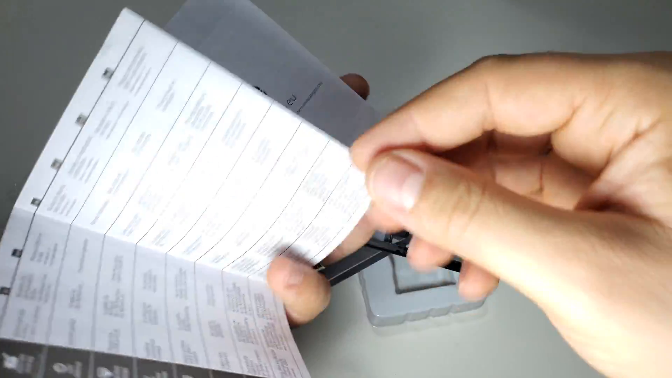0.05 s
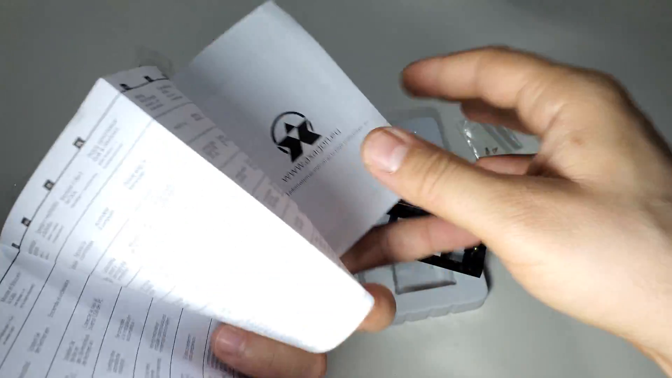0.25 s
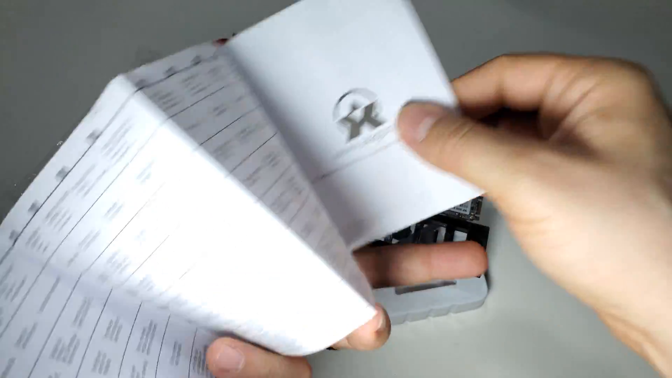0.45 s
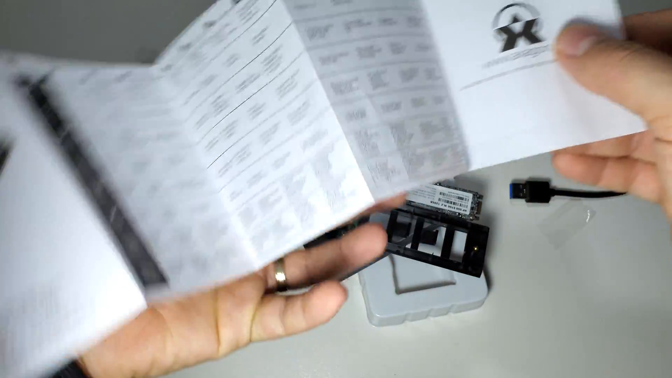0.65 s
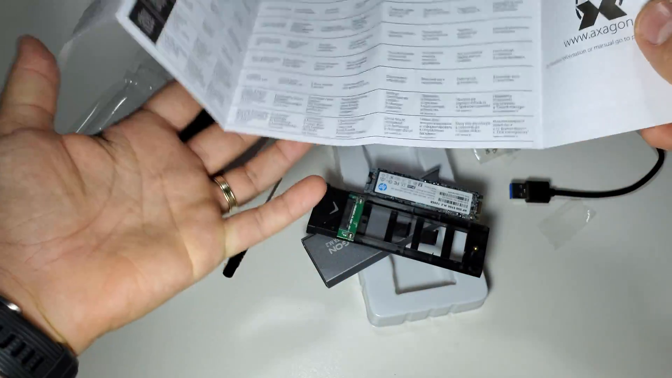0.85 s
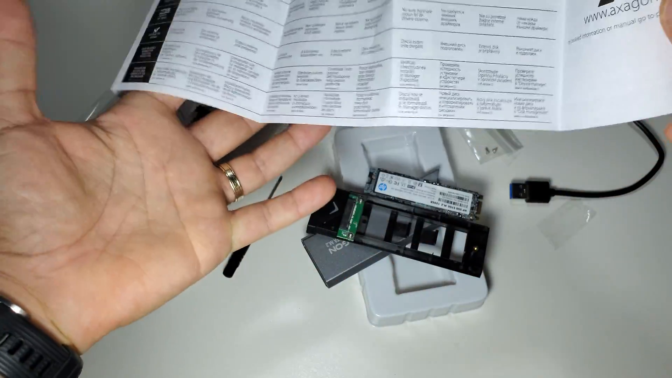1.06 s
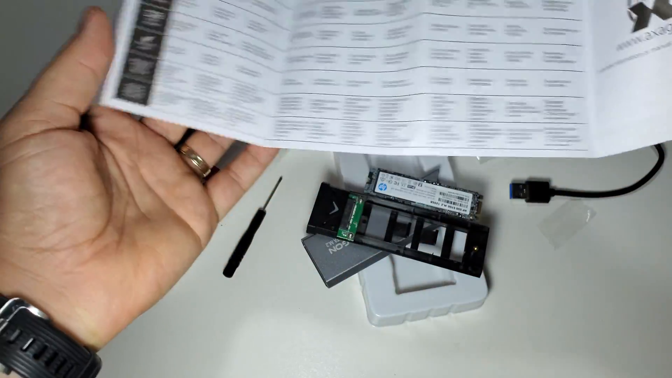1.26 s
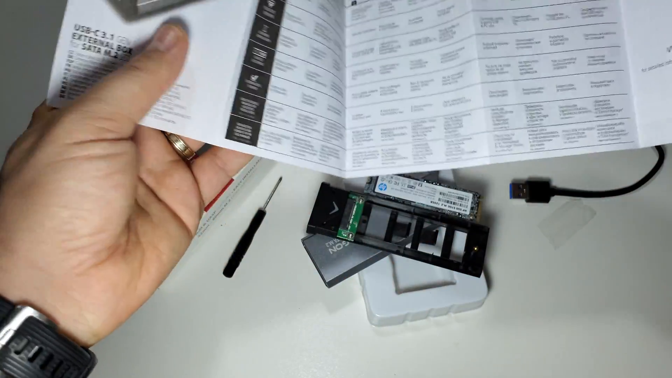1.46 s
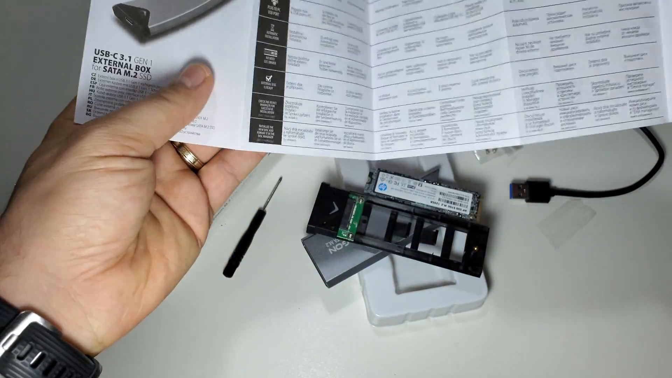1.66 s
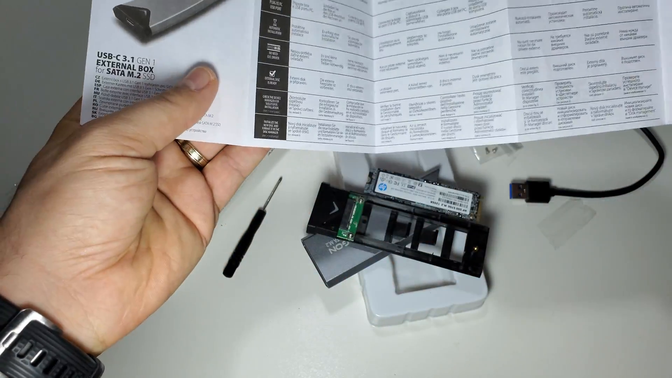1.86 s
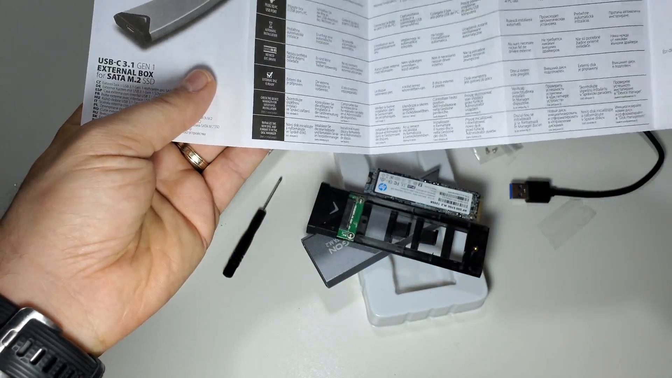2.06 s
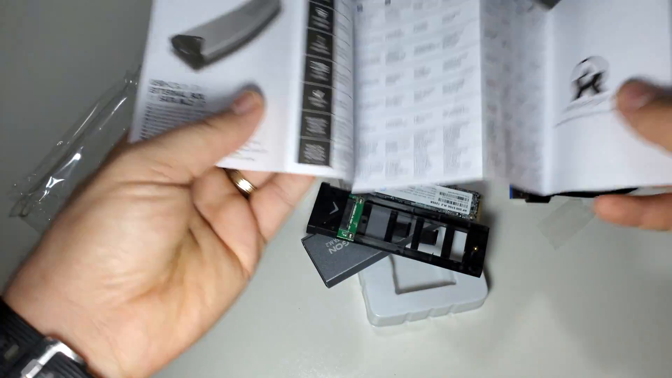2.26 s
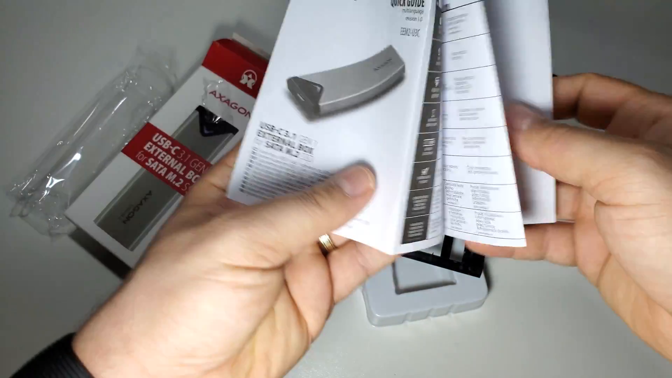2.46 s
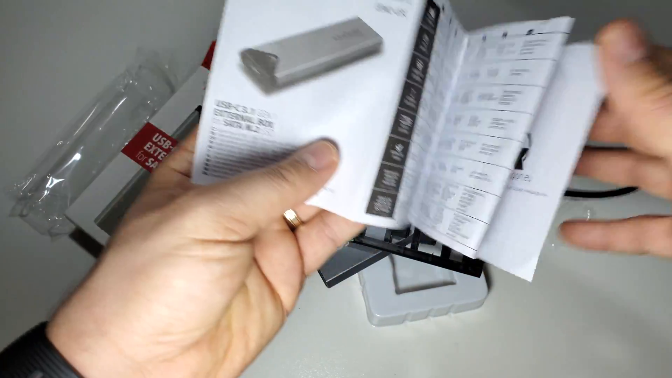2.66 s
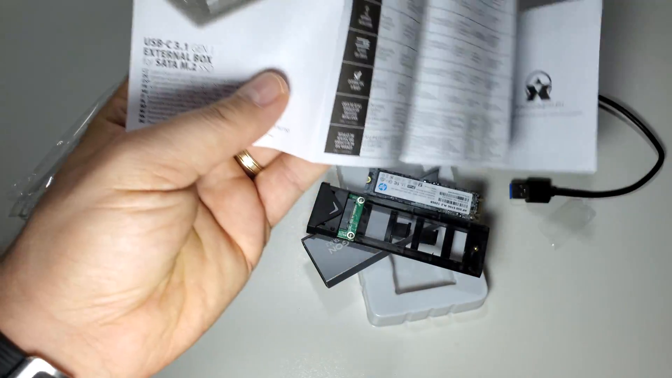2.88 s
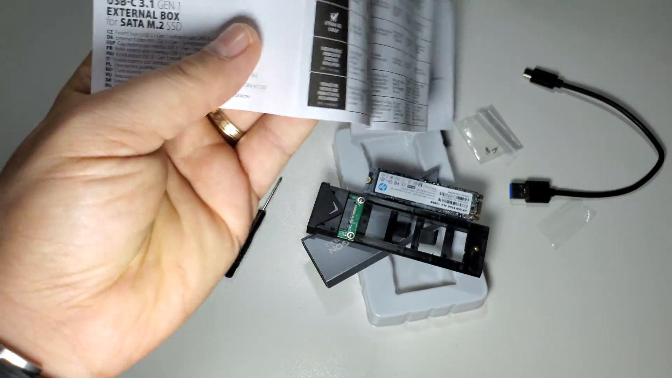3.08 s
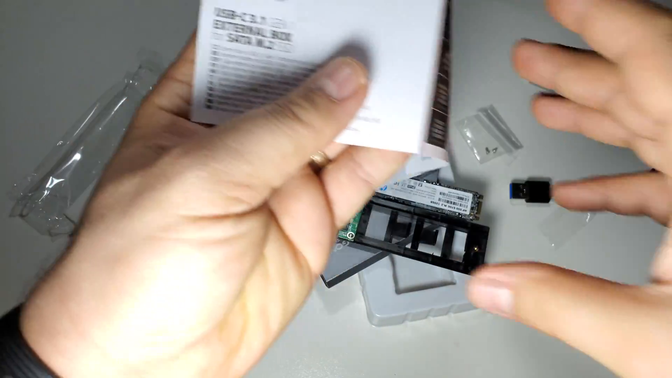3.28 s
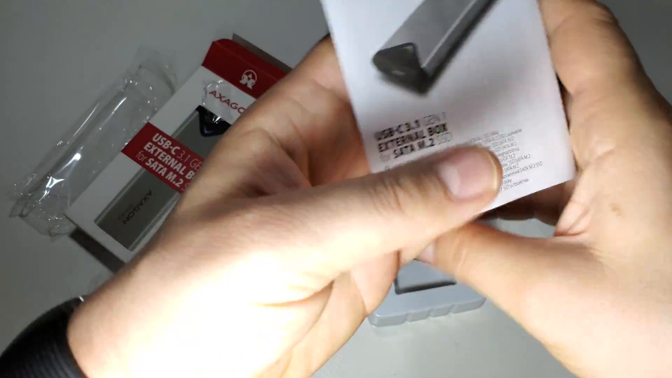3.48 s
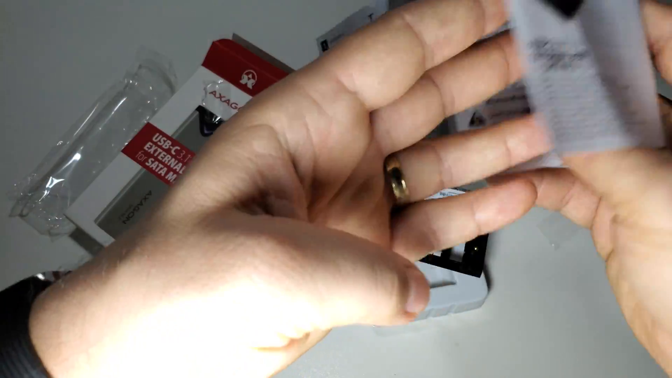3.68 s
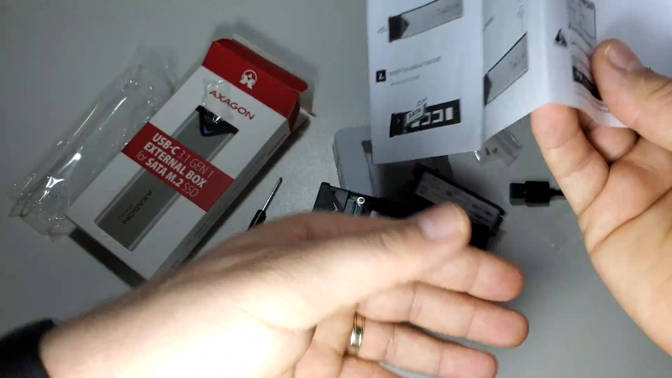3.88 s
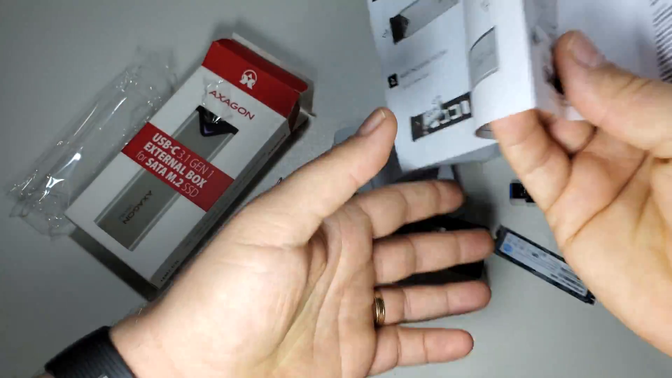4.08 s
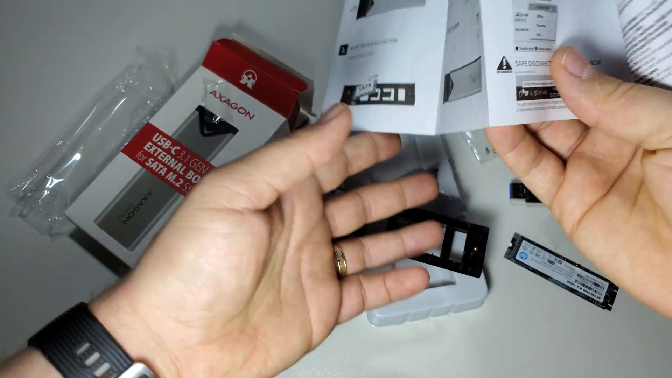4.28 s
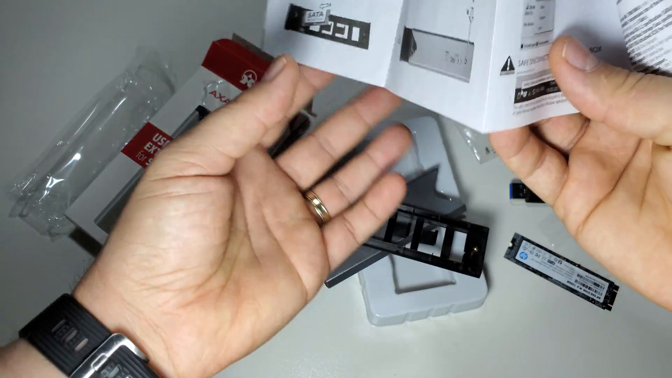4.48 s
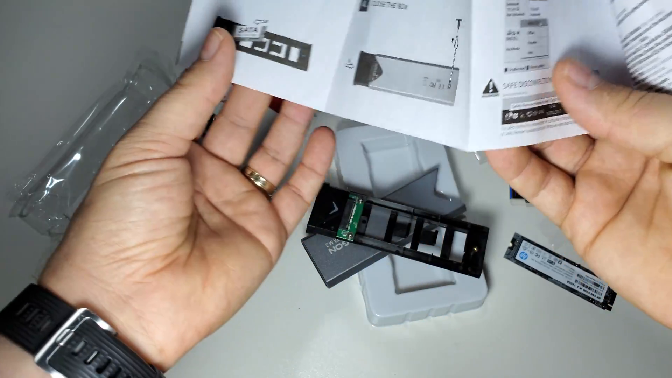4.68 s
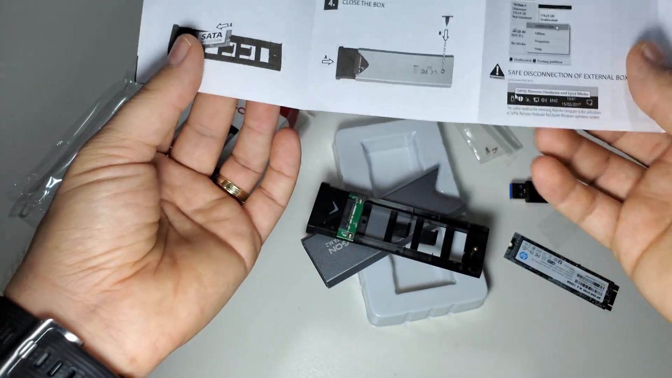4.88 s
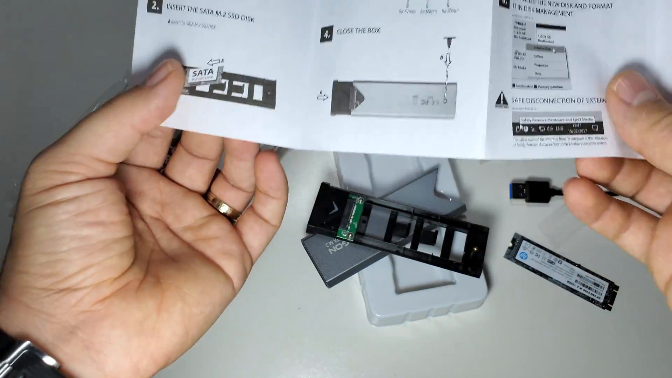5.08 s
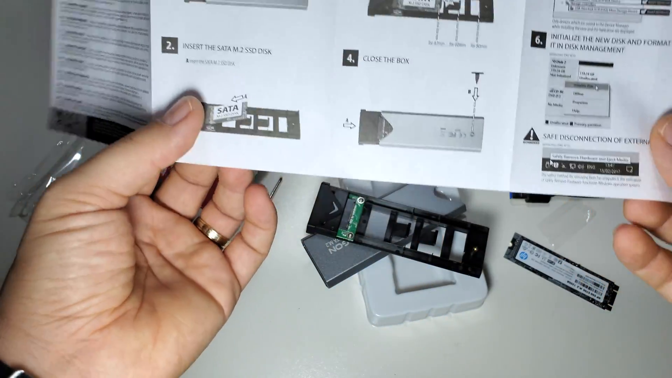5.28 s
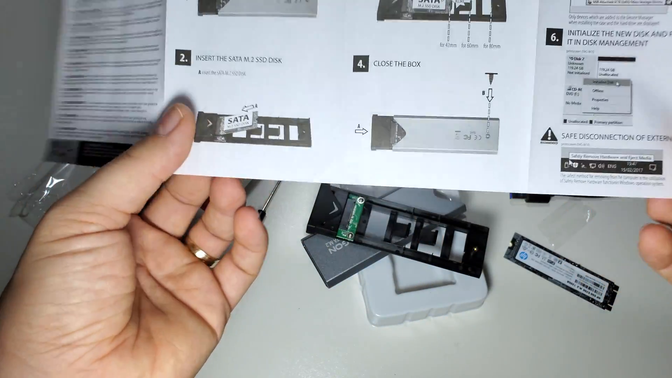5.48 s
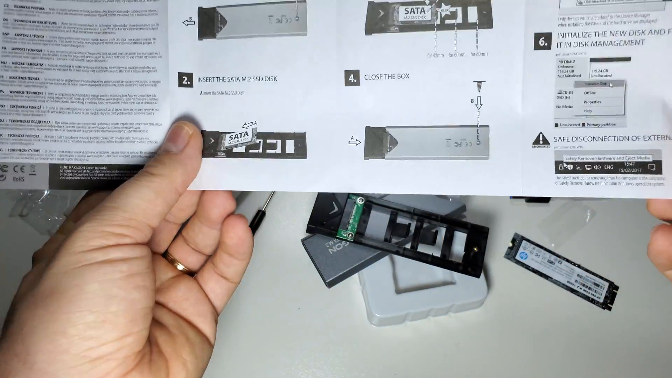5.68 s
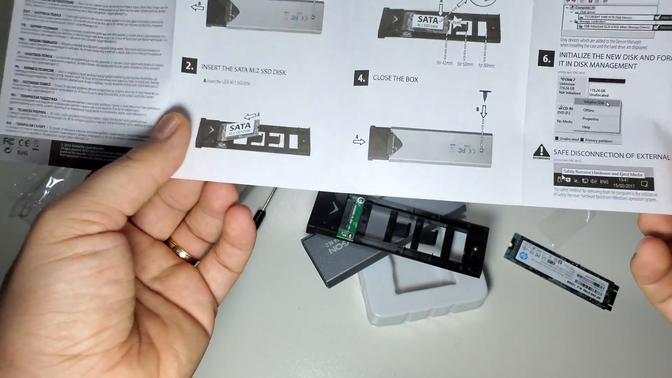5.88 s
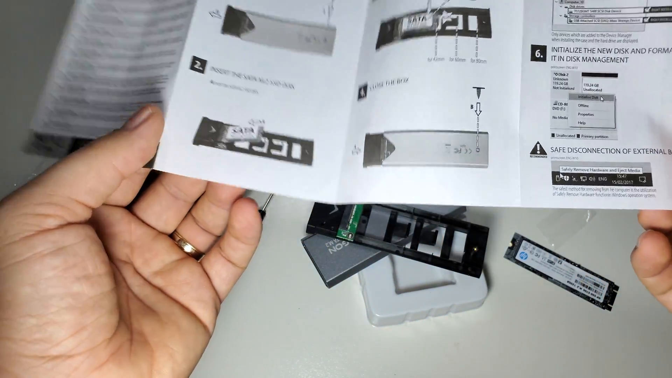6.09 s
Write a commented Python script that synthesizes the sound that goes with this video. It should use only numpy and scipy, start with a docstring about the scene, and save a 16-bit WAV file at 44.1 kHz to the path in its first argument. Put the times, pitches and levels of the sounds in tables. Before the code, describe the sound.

A paper leaflet is unfolded and turned close by, rustling, crackling and snapping at its creases, with a brief chattering plastic scrape across a desk.

```python
"""A paper leaflet is unfolded and turned in two hands just under a phone, in a small quiet room.
From the start fingers hiss along the sheet (grainy coloured noise), it flexes and flaps, and creases
snap (a click, a crackle and a ringing panel). Near 3.8 s a hand drags a small plastic case across the
desk: friction and sudden slips chatter in the case resonances. Loud creases snap as it stops near
4.1 s, then the paper handling goes on to just after 6 s. Room reflections and a faint hush lie under it all."""
import sys
import numpy as np
from scipy import signal
from scipy.fft import rfft, irfft
from scipy.io import wavfile
from scipy.ndimage import uniform_filter1d

SR = 44100
rng = np.random.default_rng(int(sys.argv[2]) if len(sys.argv) > 2 else 0)


def store_pcm(level_fs):
    """Save levels as 16-bit WAV."""
    pcm = np.round(np.clip(level_fs, -1, 1) * 32767).astype(np.int16)
    wavfile.write(sys.argv[1], SR, np.atleast_2d(pcm).T)


N = 270774  # length in samples
PORT_LAG = 3  # samples by which the right port hears the paper later


def undb(db):
    """Decibels to gain."""
    return 10 ** (np.asarray(db) / 20)


def unit(x):
    """Scale to rms 1."""
    return x / np.sqrt(np.mean(x ** 2))


def colour(x, shape):
    """Filter along the last axis by (pitch_hz, level_db) points, cutting 80 dB outside them."""
    count = x.shape[-1]
    pitch_hz, level_db = np.transpose(shape)
    log_hz = np.log(np.arange(1, count // 2 + 2) * SR / count)
    gain = undb(np.interp(log_hz, np.log(pitch_hz), level_db, left=-80, right=-80))
    return irfft(rfft(x) * gain, count)


def band(x, lo_hz, hi_hz, order=2):
    """Causal band-pass."""
    edges = np.clip([lo_hz, max(hi_hz, lo_hz + 10)], 10, .45 * SR)
    return signal.sosfilt(signal.butter(order, edges, "band", fs=SR, output="sos"), x)


def walk(rate):
    """Random level that glides to a new value about rate times a second."""
    hold = int(SR / rate)
    steps = np.repeat(rng.standard_normal(N // hold + 1), hold)
    return uniform_filter1d(steps, hold)[:N]


def pair(alike, count, lag=PORT_LAG):
    """Noise at the two ports, correlated by alike (0-1), the right one shifted by lag samples."""
    alike = np.clip(alike, 0, .99)
    mid, side = rng.standard_normal((2, count))
    shared = np.sqrt((1 + alike) / 2) * mid
    apart = np.sqrt((1 - alike) / 2) * side
    return np.array([shared + apart, np.roll(shared - apart, lag)])


def grains(rate, scatter_db, tail_s):
    """Envelope of tiny fibre slips: random times, a few large among many small, each dying fast."""
    hit = rng.random(N) < rate / SR
    size = rng.exponential(size=N)
    power = hit * undb(2 * scatter_db * np.minimum(size, 4))
    keep = np.exp(-1 / (tail_s * SR))
    return unit(np.sqrt(signal.lfilter([1 - keep], [1, -keep], power)))


# colour of the hush: pitch_hz [Hz], level_db [dB per Hz, relative]
HUSH_COLOUR = [(12, -37), (20, -4.5), (60, -3.5), (134, -12.5), (357, -17.5), (459, -21.5), (1060, -22.5),
               (1290, -28), (1960, -30), (16000, -34)]
HUSH_DB = -75.5  # rms


def quiet_hush():
    """Steady, bass-heavy noise of the quiet room."""
    return unit(colour(pair(0.21, count=N), HUSH_COLOUR)) * undb(HUSH_DB)


# how the reflections die: pitch_hz [Hz], t60_s [s], likeness of the two ports [0-1]
ROOM_DECAY = [(150, 0.23, .9), (650, 0.15, 1), (2280, 0.26, 0), (8600, 0.27, 0)]
ROOM_DB = -9  # gain after the tail is scaled to unit energy


def room(x):
    """Diffuse reflections, each region of pitch dying at its own pace, the bass alike at both ports."""
    t = np.arange(SR // 2) / SR
    tail = np.zeros((2, len(t)))
    for pitch_hz, t60_s, alike in ROOM_DECAY:
        diffuse = band(pair(alike, count=len(t)), pitch_hz / 2, min(pitch_hz * 2.18, 18000))
        tail += diffuse * np.exp(-np.log(1000) * t / t60_s)
    tail = tail * np.minimum(t / 0.0034, 1)  # reflections build up over 3.4 ms
    tail = tail / np.sqrt(np.sum(tail ** 2) / 2)
    mono = x.mean(axis=0, keepdims=True)
    return undb(ROOM_DB) * signal.fftconvolve(mono, tail, axes=1)[:, :N]


# steady friction, creeping and then sliding: time_s [s], force_db [dB]
DRAG_FORCE = [
    [(3.78, -38.5), (3.79, -43.5), (3.908, -42), (3.958, -34.5), (3.97, -49.5)],
    [(3.972, -44.5), (3.976, -29), (4.048, -29), (4.086, -51.5), (4.09, -24)],
]
# the case slips free: start_s [s], peak_db [dB], t60_s [s, at least 0.01 in use]
SLIPS_FREE = [(3.813, -46, 0.02), (3.859, -48, 0.074), (3.892, -46, 0.024), (3.9272, -29, 0.02),
              (3.954, -28, 0.015), (3.9747, -22.5, 0.022), (3.993, -13, 0.012), (4.013, -22.5, 0.019),
              (4.034, -17.5, 0.024), (4.1019, -8.5, 0.0079)]
# modes of the case: pitch_hz [Hz], half_width_hz [Hz], level_db [dB], change_while_creeping_db [dB]
CASE_MODES = [(950, 90, -6.5, -3), (1430, 82, 0.5, 3), (1846, 60, 3, -6), (3028, 50, 2, -1.5),
              (4670, 170, 0, -9.5), (5170, 42, -10, -6), (7500, 130, -5.5, -9.5)]
CREEP_DB, SLIDE_DB = -42.5, -34  # force at which the case only creeps, and at which all its modes speak
FLUTTER_DB = 2.5  # how much each mode wavers
WOBBLE_S, WOBBLE_HZ = .0006, 24.66  # time sway before smoothing, and its rate


def drag():
    """Friction and sudden slips on the desk drive the case modes, which flutter as the contact shifts."""
    time_s, force_db = np.transpose(sorted(map(tuple, np.vstack(DRAG_FORCE))))
    t = np.arange(N) / SR
    force = undb(np.interp(t, time_s, force_db, left=-120, right=-120)) * grains(700, 2.2, 0.0047)
    for start_s, peak_db, t60_s in SLIPS_FREE:
        fall_db = 60 * np.maximum(t - start_s, 0) / max(t60_s, .01)
        force = force + (t > start_s) * undb(peak_db - fall_db)
    slips = pair(0.51, count=N) * force

    smooth_db = 20 * np.log10(uniform_filter1d(force, 900) + 1e-9)
    creep = np.clip((SLIDE_DB - smooth_db) / (SLIDE_DB - CREEP_DB), 0, 1)
    shell, mode_power = np.zeros((2, N)), 0
    for pitch_hz, half_width_hz, level_db, creep_db in CASE_MODES:
        gain = undb(level_db + creep_db * creep + FLUTTER_DB * walk(90))
        shell += gain * band(slips, pitch_hz - half_width_hz, pitch_hz + half_width_hz)
        mode_power += undb(2 * level_db) * half_width_hz
    # the shifting contact bends the pitch of the case
    samples = np.arange(N)
    sway = samples + WOBBLE_S * SR * uniform_filter1d(walk(WOBBLE_HZ), 600)
    shell = np.array([np.interp(sway, samples, port) for port in shell])
    scrape = undb(-3.5) * band(slips, 470, 4700, order=1) + undb(-23.0) * band(slips, 8000, 16000)
    return np.sqrt(SR / 8 / mode_power) * shell + scrape


# moves of the hands: start_s [s], length_s [s], onset_ms [ms for the last 20 dB, at least 2 in use],
# rub_swell_db [dB], bend_swell_db [dB], hiss_db [dB], swish_db [dB], flex_db [dB], flap_db [dB],
# left_minus_right_db [dB]; the four levels hold midway through the move
HAND_MOVES = [(0.0, 0.068, 5.0, 4, -4.5, -66, -60, -49.5, -49, 2),
              (0.147, 0.067, 27, 13, 9.5, -59.5, -51, -55, -55, 3.6),
              (0.312, 0.045, 10, 2, 7, -68.5, -60, -71, -71.0, -1),
              (0.391, 0.12, 14, -13.0, -16, -53.0, -44.5, -46.5, -46.5, 1.6),
              (0.543, 0.098, 13, -11, 2.5, -63.5, -54, -48.0, -48.0, 2.5),
              (0.798, 0.11, 11.5, 1.0, 6, -55.5, -60.5, -56, -56.5, 2.5),
              (0.961, 0.062, 1.5, -8, -17, -79, -57, -48.5, -57.5, 1.6),
              (1.07, 0.095, 5.0, 14.5, 0.5, -71.5, -64.5, -62, -60.5, 3),
              (1.235, 0.11, 19, 9.5, -4, -51, -59.5, -60.5, -66, 1.3),
              (1.325, 0.14, 5.0, 9, 18, -52.5, -57, -53.0, -56.5, 1.5),
              (1.533, 0.13, 10.0, 5.5, -9, -60, -66.5, -65, -65, 3),
              (1.695, 0.055, 10.0, 9, -9, -64, -69.5, -64, -67, 3.5),
              (2.217, 0.081, 40.5, 0.5, 14, -67.5, -74.5, -76.5, -73, 1.5),
              (2.302, 0.093, 17, -12, 20, -62.5, -71, -65, -72.0, 0.4),
              (2.425, 0.052, 17, -5, -12, -60, -61, -51, -55.0, -2),
              (2.491, 0.13, -4, -7, -13, -48, -56.5, -61.5, -59, 0.2),
              (2.684, 0.11, 22, -1, -3.5, -60.5, -55, -60, -57, 0),
              (2.858, 0.15, 20.0, -1.5, -11, -67.0, -72, -66.0, -69, -2),
              (3.073, 0.099, 22.5, 11.5, 1, -75, -73.5, -64.5, -72, 4),
              (3.234, 0.12, 24, -3, 5.0, -66.5, -69, -68, -70, 3.5),
              (3.373, 0.13, 17, 11.5, 21, -60.5, -60.5, -64, -65, 2.5),
              (3.576, 0.16, 38, 7, 5.5, -56, -55.5, -57, -62.5, 2),
              (3.773, 0.021, 13, -10, -2, -52.5, -54, -60.0, -59.0, -2),
              (3.896, 0.16, 53, 19, 26, -43, -40.5, -51.5, -61, 0),
              (4.093, 0.013, -3, -17, -23, -40, -29, -31, -51, -0.5),
              (4.133, 0.058, 1.5, -14, -11, -37, -34.5, -36, -56, 0.5),
              (4.202, 0.051, 5.0, -2, -8, -64, -47.5, -49, -61, 0),
              (4.262, 0.17, 5.0, -15, -15.5, -66, -64, -64.5, -68.0, 0.5),
              (4.508, 0.064, 30.5, 10.5, 1.5, -63.0, -75.5, -71, -71.5, 2),
              (4.593, 0.098, 4, -6, 1, -68.5, -71, -63, -64.5, 1.8),
              (4.742, 0.059, 35, 7.5, 5.5, -56.5, -65.5, -75.0, -77, 0),
              (4.81, 0.067, 7, 18.5, -12.5, -66, -72, -52.5, -57.0, -2),
              (4.882, 0.14, 13.5, 7, -6, -64.5, -66.5, -57.5, -63.5, 1),
              (5.075, 0.12, 53, -1, -0.5, -52, -51.5, -59, -63, 1),
              (5.227, 0.097, 18, -5, 0, -58, -60.5, -58, -55.5, 2.3),
              (5.371, 0.053, 30.0, 14.5, 5, -54.5, -64.0, -61, -67, 2.4),
              (5.455, 0.039, 5.0, -3, -16, -85, -69.5, -61, -64, 8),
              (5.533, 0.06, 20, -5.5, -7.5, -72.0, -84, -68.0, -64.5, 3.5),
              (5.647, 0.077, 15, 7.5, -5, -66.5, -63, -61.0, -55, -1),
              (5.767, 0.046, 5.0, -5, -14, -77.0, -69, -60.5, -63.5, -1),
              (5.843, 0.059, 4.5, -2, 4, -57.0, -66, -50.5, -57.5, 0),
              (5.957, 0.036, 18, 9.5, 1, -58.5, -70.5, -60.5, -65.5, 1.2),
              (6.081, 0.07, 14, 1, 5, -63.5, -64.0, -61, -60.5, 1.4)]
ONSET_DB = 20
SKIN_FALL, FLEX_FALL, FLAP_FALL = 500, 410, 200  # dB per s after a move


def moving(level_db, swell_db, fall):
    """Gain at both ports: every move sets in, swells or sinks while it lasts, and falls away."""
    start, length, onset_ms, pan_db = np.array(HAND_MOVES)[:, [0, 1, 2, 9]].T[:, :, None]
    t = np.arange(0, N / SR + .002, .001)  # drawn every millisecond
    db = level_db[:, None] + swell_db[:, None] * (np.clip((t - start) / length, 0, 1) - .5)
    rise = ONSET_DB / np.maximum(onset_ms / 1000, .002)  # dB per s
    db = db - rise * np.maximum(start - t, 0) - fall * np.maximum(t - start - length, 0)
    # overlapping moves add in power
    ports = [np.sqrt(undb(2 * db + side * pan_db).sum(axis=0)) for side in (1, -1)]
    return np.array([np.interp(np.arange(N) / SR, t, port) for port in ports])


# colours of the flexing sheet and the flapping air: pitch_hz [Hz], level_db [dB per Hz, relative]
FLEX_COLOUR = [(200, -6), (350, -6), (700, 4), (1100, -4), (1800, -10.5), (2600, -25)]
FLAP_COLOUR = [(18, -26.5), (35, -9.5), (70, -3.5), (150, -8), (280, -11.5), (450, -15)]
# a panel flips over and shoves air at the ports: time_s [s], level_db [dB]
AIR_PUFFS = [(.01, -56), (.2, -58), (0.397, -36), (.585, -45), (.63, -51), (.97, -49), (1.37, -56),
             (1.455, -45.5), (1.64, -52), (1.71, -57), (2.44, -61), (2.768, -50), (3.44, -55), (3.488, -47),
             (3.78, -63), (4.16, -46), (4.329, -50), (4.7, -60.5), (4.82, -59), (5.1, -49.5), (5.28, -56.5),
             (5.665, -49.5), (5.899, -47), (6.11, -54)]
PUFF_S = 0.014  # from the peak of a puff to 1/e


def bending():
    """The sheet flexes with a low crackle and pushes air as it flaps."""
    swell_db, flex_db, flap_db = np.array(HAND_MOVES)[:, [4, 7, 8]].T
    crackle = grains(150, 1.8, 0.006)
    flex = unit(colour(pair(0.7, count=N) * crackle, FLEX_COLOUR)) * undb(3.6 * walk(30))
    flap = unit(colour(pair(.9, count=N), FLAP_COLOUR)) * undb(0.6 * walk(11))
    t = np.arange(N) / SR
    puffs = sum(undb(db) * np.exp(-((t - time_s) / PUFF_S) ** 2) for time_s, db in AIR_PUFFS)
    flap_gain = np.hypot(moving(flap_db, swell_db, FLAP_FALL), puffs)
    return flex * moving(flex_db, swell_db, FLEX_FALL) + flap * flap_gain


# colours of skin on paper, from low to high: pitch_hz [Hz], level_db [dB per Hz, relative]
SWISH_COLOUR = [(1000, -12.5), (1600, 0.5), (2200, -1.5), (2800, -3.5), (3600, -16)]
RUSTLE_COLOUR = [(2200, -28.5), (3000, -2), (4200, 2.5), (5500, -0.5), (7500, -23)]
HISS_COLOUR = [(2000, -36), (3500, -16), (5200, -8.5), (7200, -1), (8800, -10), (11000, -3.5),
               (13500, -12.5), (17000, -11.5)]
RUSTLE_SHARE, RUSTLE_DB = .55, 0  # the dry rustle lies between hiss (1) and swish (0), plus dB


def rubbing():
    """Skin on paper: fibre slips scratch while the finger slides, gone soon after it stops."""
    swell_db, hiss_db, swish_db = np.array(HAND_MOVES)[:, [3, 5, 6]].T
    rustle_db = RUSTLE_SHARE * hiss_db + (1 - RUSTLE_SHARE) * swish_db + RUSTLE_DB
    scratch = grains(900, 2.0, .003)
    fine = grains(1400, 0.64, 0.0019)
    swish = unit(colour(pair(0.14, count=N) * scratch, SWISH_COLOUR)) * undb(0.43 * walk(30))
    rustle = unit(colour(pair(0.5, count=N) * scratch, RUSTLE_COLOUR)) * undb(1.1 * walk(27))
    hiss = unit(colour(pair(0.13, count=N) * fine, HISS_COLOUR)) * undb(2.5 * walk(25))
    layers = [(swish, swish_db), (rustle, rustle_db), (hiss, hiss_db)]
    return sum(x * moving(db, swell_db, SKIN_FALL) for x, db in layers)


# creases letting go: start_s [s], body_peak_db [dB], ring_hz [Hz], thump_db, crack_db, air_db
# [dB against the body], t60_s [s, before the share of each band], left_minus_right_db [dB]
CREASES = [(0.013, -44.5, 426, -2.5, -22.5, -19.0, 0.082, 8),
           (0.068, -43.5, 443, -8.5, -10, -32, 0.082, 2.0),
           (0.149, -50.5, 970.0, -7.5, -13, -8.5, 0.081, 6),
           (0.171, -32, 484, -1.5, -1.5, -20.5, 0.045, 4.5),
           (0.194, -30.0, 1550, -3, -5.5, -19.0, 0.045, 4), (0.217, -37.5, 447, -7.5, 2, -10.5, 0.022, 5),
           (0.328, -44, 905, -13.5, -4, -11, 0.11, 10), (0.387, -32, 1620.0, -8, -11, -28, 0.081, -1),
           (0.399, -15, 2440, -15.5, 0.5, -9, 0.058, 0.5), (0.413, -19, 1870, -6, 3.5, -20, 0.042, 3.5),
           (0.448, -30.5, 1950.0, -8, -2, -22.5, 0.07, 5), (0.558, -42, 450.0, -18, 11, -22, 0.045, 5.5),
           (0.573, -18.5, 1600, -7, 2, -19.5, 0.035, 0.0), (0.6, -31.0, 500.0, -7, -6.0, -13, 0.076, -1),
           (0.631, -38, 460.0, -12, -26, -14, 0.055, 3), (0.788, -65, 450.0, -19.5, 19, 10, 0.045, -8),
           (0.82, -31.5, 620, -16, -10.5, -22, 0.11, 3.0), (0.831, -34, 2110.0, -16.5, -1, -30, 0.14, 5),
           (0.874, -30.5, 865, -14, -21, -19.0, 0.066, 2), (0.897, -35.5, 800, -23, -5, -19, 0.055, 0),
           (0.962, -32.5, 1480, -6.0, -3, -16.0, 0.045, 5), (1.01, -43, 680.0, -19, 4.5, -44, 0.049, 2),
           (1.068, -51.5, 910.0, -12, 0, -22, 0.049, 5.0), (1.088, -50, 640, -8.0, -9, -34, 0.095, 1),
           (1.106, -33, 1560, -23, -7, -36, 0.085, 6.5), (1.233, -40.5, 2130, -21.5, -21, -23, 0.062, 2.5),
           (1.349, -33.0, 935, -31, -11, -5, 0.04, 5), (1.444, -28.5, 950, -10, -4.5, -10, 0.032, 2),
           (1.468, -28, 760.0, -13, -1, -45, 0.02, 1), (1.499, -41.5, 895, -4, -15.0, -20, 0.052, -1),
           (1.552, -48, 610.0, -5, -21, -6, 0.05, -1), (1.574, -41.0, 683, 1.5, -17, -20, 0.041, 2),
           (1.636, -26, 1000, -24, -1.5, -25.0, 0.035, 3.5),
           (1.7, -46, 920.0, -12.5, -15, -14.5, 0.045, -1),
           (1.92, -57.5, 600.0, -16, -43.5, -15.5, 0.067, 3),
           (2.251, -44.5, 590.0, -12, -4.5, -27, 0.053, 0.0),
           (2.294, -53, 630.0, -12.0, -22, -11, 0.036, 0.0),
           (2.377, -52, 890.0, -12, -21, -19, 0.045, -5.5), (2.43, -31, 620, -22, -14, 0, 0.051, 0.0),
           (2.441, -31, 605, -13, 5.5, -17, 0.078, 2.5), (2.492, -34.5, 1500, -7, 1.5, 6, 0.06, -1),
           (2.669, -42, 590.0, -9, -35, -11.5, 0.045, 5), (2.687, -17, 1200, -17, 0.5, 1.5, 0.028, 2.0),
           (2.733, -31.5, 815, -12.0, -16, -26, 0.049, -3),
           (2.754, -25.5, 610.0, -32, -13, -39, 0.045, 1.0), (2.768, -34, 930.0, -6.5, -3, -25, 0.045, -1),
           (2.783, -28.5, 820, -27, -25, -6, 0.016, 2.0), (2.878, -48.5, 690, 0, -17, -19, 0.034, 2.0),
           (2.897, -26, 528, -13.5, -6, -40, 0.023, -6),
           (3.076, -54.5, 1440.0, -22.5, -13, -4.5, 0.051, -3),
           (3.097, -49, 620.0, -9, -17, -28, 0.04, -0.5), (3.119, -53, 730.0, -18, -25, -26.0, 0.029, -5),
           (3.141, -38, 900, -10, -6.5, -20, 0.045, 4), (3.282, -47, 756, -16, -11, -4, 0.1, 1),
           (3.402, -35, 1490, -14.5, 0, -42, 0.047, 0), (3.435, -38.5, 940.0, -4.5, -2, -35, 0.13, -8.5),
           (3.483, -36.5, 664, -6.5, -9, -19, 0.031, 6), (3.575, -60.5, 2060.0, -1, 16, -3, 0.078, 13),
           (3.716, -45, 2000, -4, 6, 3, 0.023, -2), (3.765, -40, 726, -5, 3.5, -7, 0.036, 6.5),
           (4.092, -16.5, 1840, -34, -21.5, -5.5, 0.039, -2.5),
           (4.1, -17, 1730, -14, -13.5, -11.5, 0.077, 2), (4.1335, -18.5, 1020, -5, -1, -17, 0.045, 2),
           (4.15, -13.5, 920, -6, -17, 1, 0.034, 10), (4.154, -13.5, 996, -30, -14.5, 10.5, 0.045, -3.5),
           (4.179, -28, 736, -17.5, -25, 4, 0.042, -9), (4.229, -26, 646, -7.5, -7, -29, 0.025, -4),
           (4.307, -32, 1840, -17, 2.5, -40, 0.059, 2.0), (4.485, -59, 780, -1.5, -19.5, -14, 0.074, 7),
           (4.604, -48.0, 980.0, -6.5, 1, -1, 0.033, 7), (4.804, -39, 1470, -4.5, -7.5, -17, 0.058, 2),
           (4.818, -27, 1110, -16, -8, -39.5, 0.046, 0), (4.906, -42.0, 785, -12, -16, -12, 0.035, 3.0),
           (4.937, -39, 775, -6.5, -19, -25.0, 0.067, -2), (5.232, -23, 1370.0, -33, 3, -26, 0.033, 5.5),
           (5.282, -39.5, 654, -4, -10, -1, 0.065, 4.0), (5.39, -39.5, 446, -7, -25, -13.0, 0.045, 5),
           (5.459, -39.5, 790.0, -7.5, -22, -30, 0.034, 2.5), (5.554, -59, 466, 8.5, -20.5, -12, 0.045, 3),
           (5.646, -47.5, 832, 0.5, -21.5, -29.0, 0.031, 0.5),
           (5.656, -25.0, 750, -13.5, -9.5, -36, 0.065, -2.0),
           (5.705, -41.0, 2070.0, -18, -1.5, 0.5, 0.045, 1.0), (5.77, -38.5, 700, -15, -19, -33, 0.036, 4),
           (5.838, -44, 510.0, -9, -23, -12, 0.028, -2), (5.87, -36.0, 730.0, -20, -2.5, 3.5, 0.092, 4.5),
           (5.887, -35.5, 730, -6, -34, -18, 0.029, -2.0), (5.98, -49.5, 680.0, -2, 1.5, 7, 0.025, -1),
           (6.081, -43, 700.0, -24, -10, -21, 0.037, 3.5), (6.106, -42.5, 604, -15, -25, 1, 0.039, 4.0),
           (6.13, -38.5, 1340, -16, -6.5, -31, 0.051, 3)]
# thump, body, crack, edge and air of a crease: from_hz [Hz], to_hz [Hz]
CREASE_BANDS = [(150, 450), (450, 2400), (2400, 5200), (5200, 8500), (8500, 17000)]
# ring time of each of those bands: share of t60_s [ratio]
RING_SHARES = [0.64, 1.08, 1.1, 0.68, 0.88]
KICK = 8.1  # size of the opening click against the crackle
BROAD_PER_CRACK = 0.82  # dB of broad body per dB of crack below 0: dull creases are nearly all ring
EDGE_SHARE, EDGE_DB = 0.32, 2.5  # the edge band lies between crack (1) and air (0), plus dB


def snaps():
    """Each crease lets go with a click and a short crackle, then the panel rings down, leaning on one pitch."""
    out, t = np.zeros((2, N + 8192)), np.arange(8192) / SR
    lags = rng.integers(-2, 7, len(CREASES))  # every crease sits elsewhere on the sheet
    for crease, lag in zip(CREASES, lags):
        start_s, peak_db, ring_hz, thump_db, crack_db, air_db, t60_s, pan_db = crease
        click = np.zeros((2, len(t)))
        click[[0, 1], [2, 2 + lag]] = -KICK
        parts = []
        for (lo, hi), alike, share in zip(CREASE_BANDS, (0.96, 0.87, 0.31, 1.0, 1.0), RING_SHARES):
            held = np.maximum(t - 0.064 * t60_s, 0)  # full for a moment before it dies
            fade = np.exp(-np.log(1000) * held / max(share * t60_s, .006))
            fade = fade + 1.2 * np.exp(-t / 0.00028)  # sharp attack
            crackle = pair(alike, count=len(t), lag=lag) * fade
            parts.append(band(crackle + click, lo, hi, order=4))
        broad = undb(BROAD_PER_CRACK * min(crack_db, 0)) * parts[1]
        parts[1] = broad + 0.82 * band(parts[1], ring_hz / 1.227, ring_hz * 1.25, order=2)
        edge_db = EDGE_SHARE * crack_db + (1 - EDGE_SHARE) * air_db + EDGE_DB
        parts_db = thump_db, 0, crack_db, edge_db, air_db
        burst = sum(undb(db) * part / np.abs(part).max() for db, part in zip(parts_db, parts))
        i = int(start_s * SR)
        out[:, i:i + len(t)] += burst * undb(peak_db + np.array([[pan_db], [-pan_db]]) / 2)
    return out[:, :N]


def scene():
    """Hands, paper and case close by, the room answering, and its hush."""
    near = drag() + bending() + rubbing() + snaps()
    return quiet_hush() + room(near) + near


LEFT_BASS_DB = 2.5  # left against right
CEILING = .6  # the phone rounds peaks toward this
TOP_HZ = 15800


def record(dry):
    """The left port takes a little more bass; the phone rounds the loudest peaks and cuts the top."""
    tilt = undb(np.array([[LEFT_BASS_DB], [-LEFT_BASS_DB]]) / 2) - 1
    bass = band(dry, 16, 300, order=1) * tilt
    soft = CEILING * np.tanh((dry + bass) / CEILING)
    return signal.sosfilt(signal.ellip(10, .2, 60, TOP_HZ, fs=SR, output="sos"), soft)


dry = scene()
out = record(dry)
store_pcm(out)
```